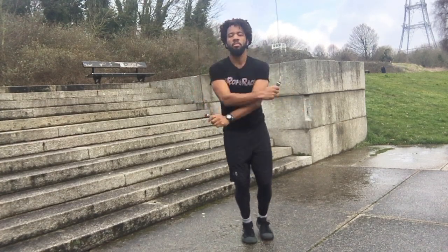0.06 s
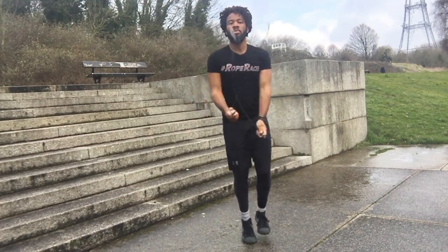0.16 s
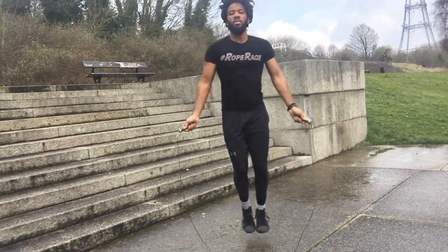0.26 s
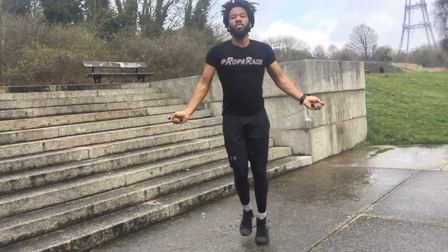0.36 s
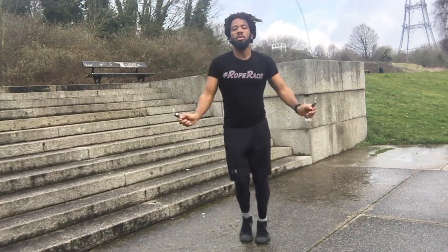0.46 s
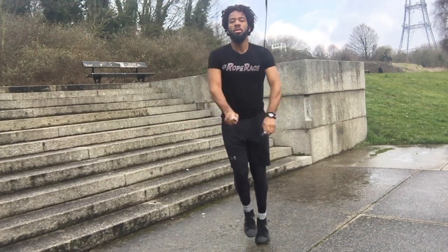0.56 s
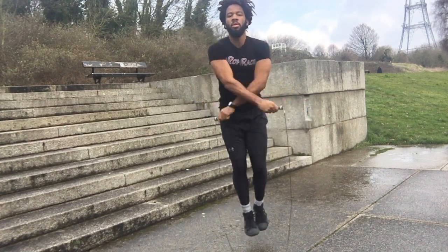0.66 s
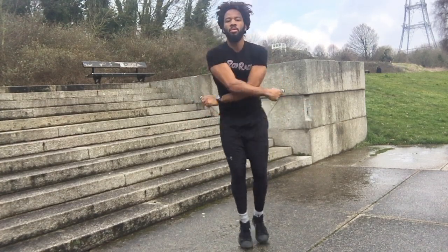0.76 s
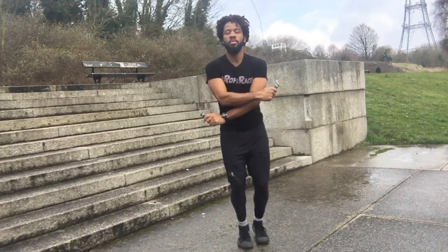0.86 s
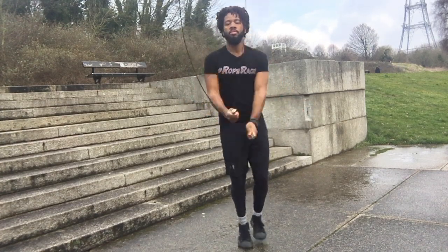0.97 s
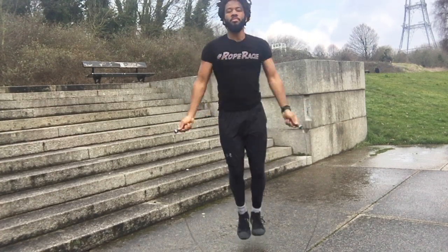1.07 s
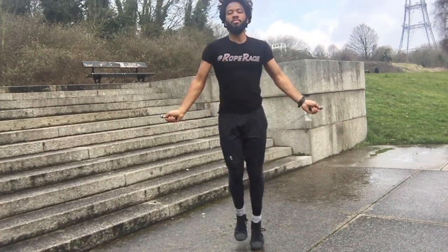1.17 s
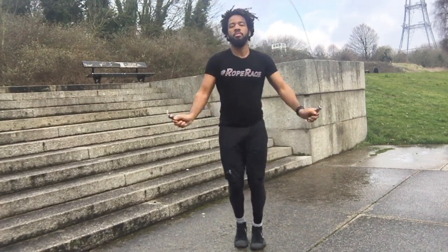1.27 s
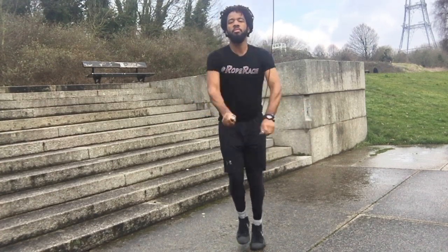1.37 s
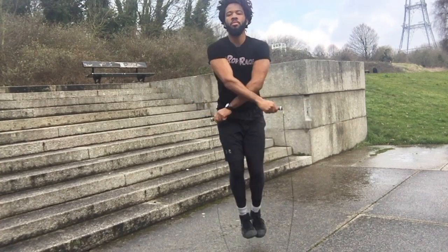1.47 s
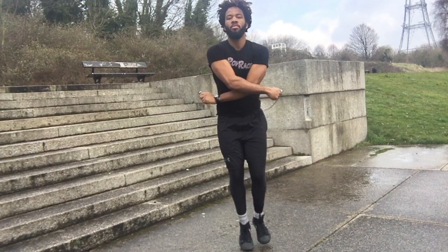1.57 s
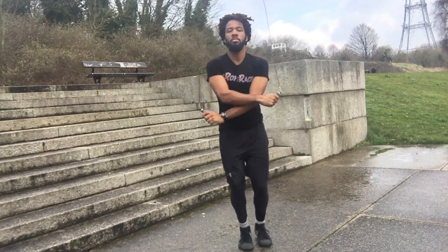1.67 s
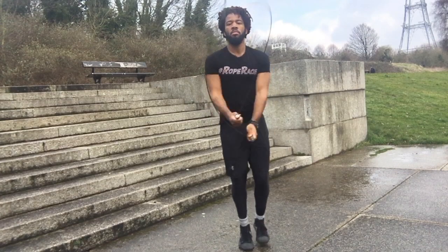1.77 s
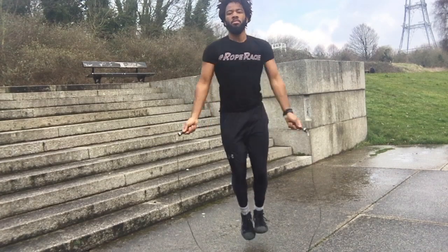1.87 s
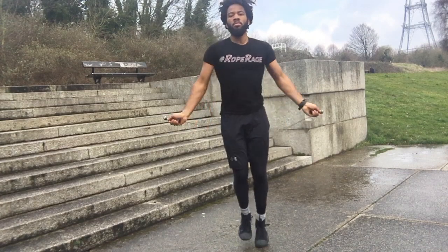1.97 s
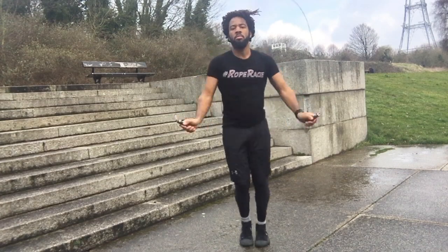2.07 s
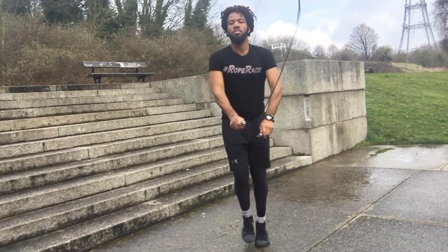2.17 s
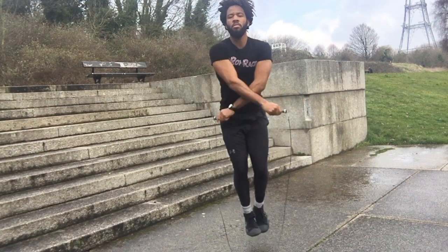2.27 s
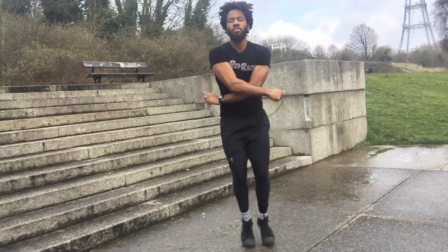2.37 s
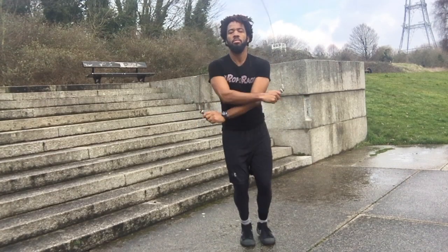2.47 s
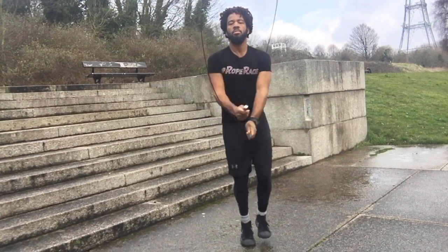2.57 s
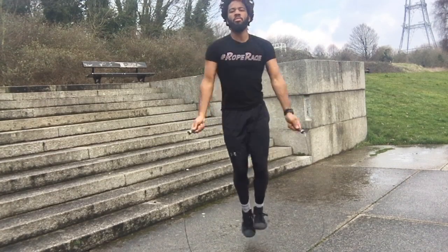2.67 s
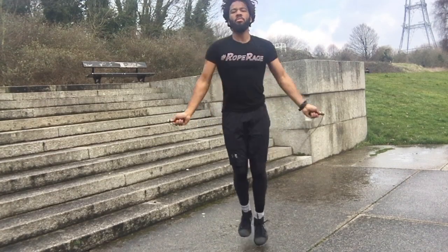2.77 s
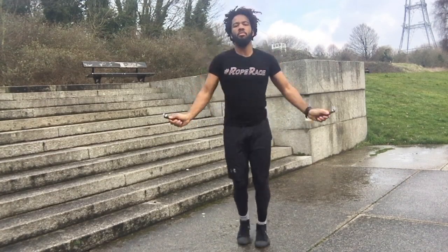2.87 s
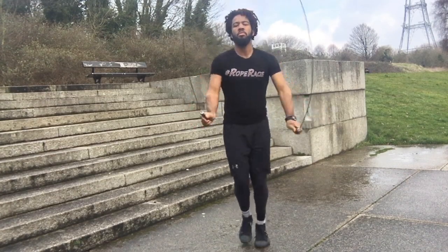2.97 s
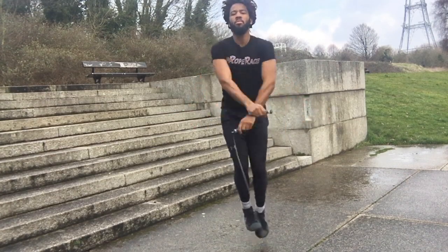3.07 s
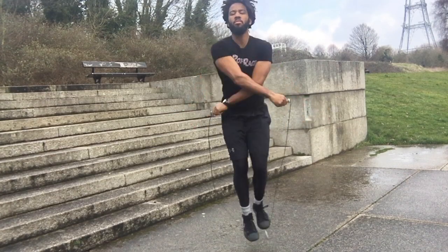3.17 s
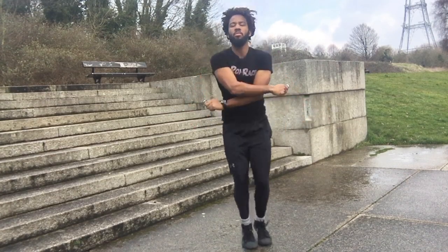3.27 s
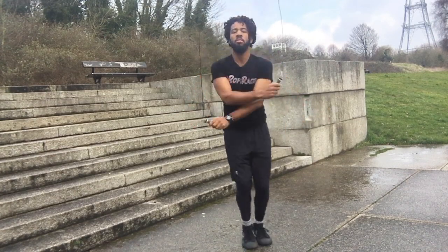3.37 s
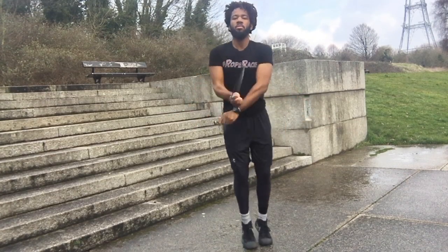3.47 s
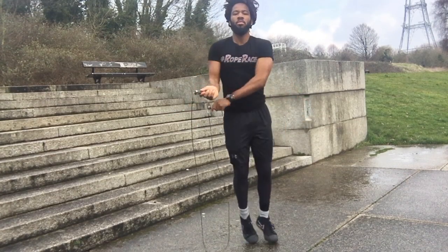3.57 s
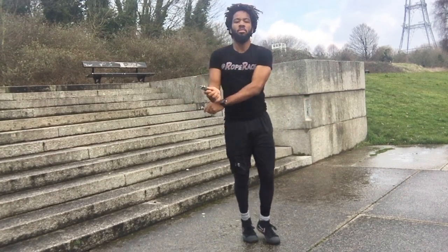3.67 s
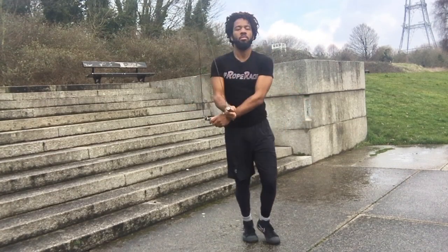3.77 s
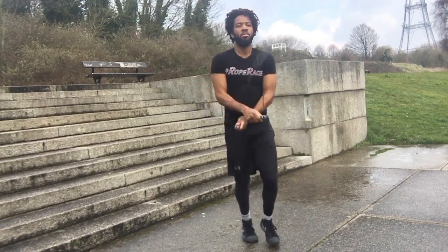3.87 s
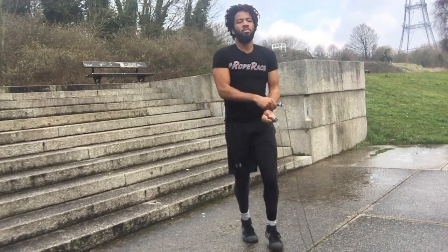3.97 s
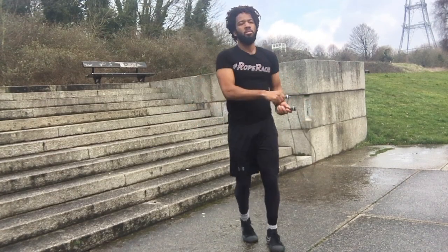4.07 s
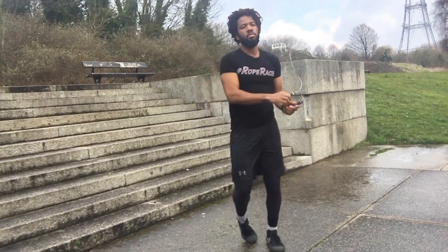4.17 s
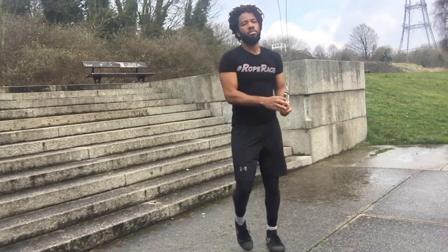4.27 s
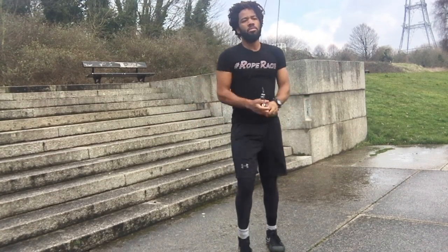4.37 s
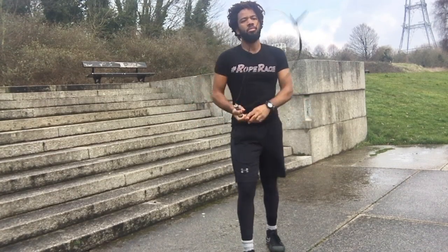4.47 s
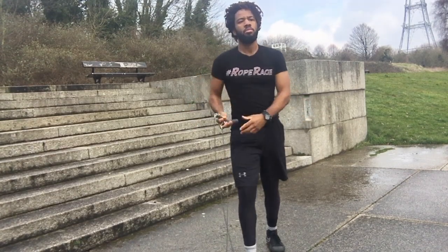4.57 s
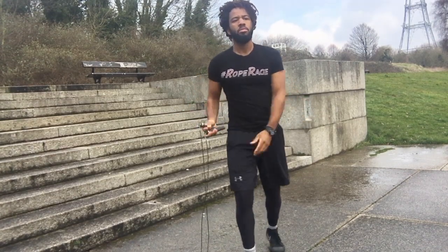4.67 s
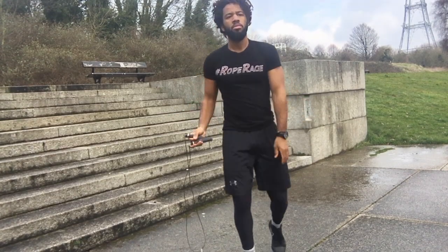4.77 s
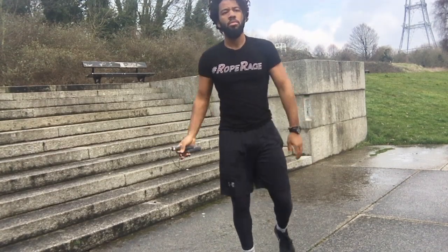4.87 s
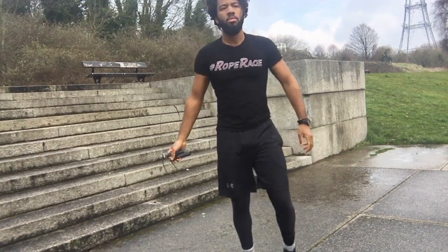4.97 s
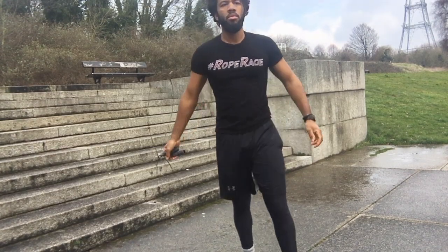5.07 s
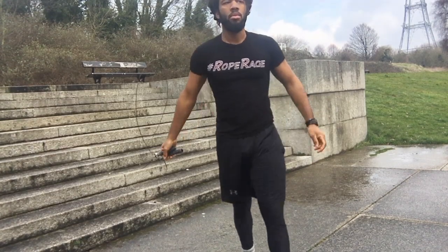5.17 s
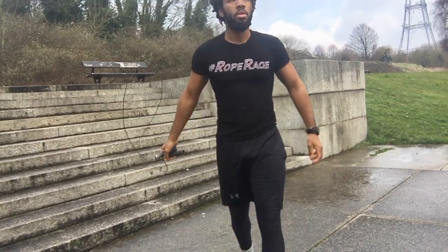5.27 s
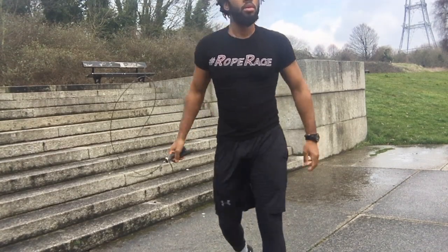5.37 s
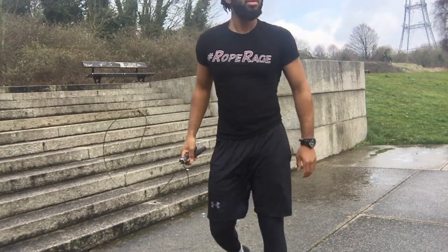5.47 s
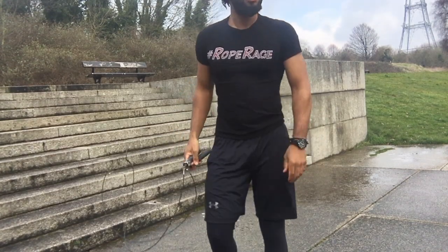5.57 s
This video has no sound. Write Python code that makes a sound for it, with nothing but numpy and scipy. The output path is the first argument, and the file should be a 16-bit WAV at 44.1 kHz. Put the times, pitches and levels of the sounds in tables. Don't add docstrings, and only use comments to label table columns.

```python
import sys
import numpy as np
from scipy import signal
from scipy.fft import rfft, irfft, next_fast_len
from scipy.io import wavfile

SR = 44100
rng = np.random.default_rng(int(sys.argv[2]) if len(sys.argv) > 2 else 0)


def gain_from_decibels(decibels):
    exponent = np.asarray(decibels, float) / 20
    return 10 ** exponent


def inscribe(sig):
    pcm = np.round(np.clip(np.atleast_2d(sig).T, -1, 1) * 32767)
    wavfile.write(sys.argv[1], SR, pcm.astype(np.int16))


N = 247401
T = np.arange(N) / SR

# start in seconds, peak in dB, spread of the contact in ms,
# splash in dB, air rush in dB.
SLAPS = [(0.3209, -18, 2.3, -25.5, -61), (0.7238, -12.5, 2, -30.5, -56), (1.1296, -12, 3.85, -31.5, -54.5),
         (1.5239, -11, 1.1, -36, -52.5), (1.9194, -11, 2.7, -34, -52), (2.3163, -14.5, 2.93, -29.5, -53),
         (2.7412, -14, 3.8, -30, -59), (3.1817, -19.5, 3.4, -30, -60.5), (3.626, -28, 3.5, -38, -63.5),
         (4.0241, -27, 0.97, -22, -64), (4.6702, -25.5, 3.3, -25.5, -81), (4.79, -30, 3.8, -28, -75.5),
         (4.8156, -30, 3.7, -37, -75)]
# middle in seconds, level in dB, # pitch
# in Hz, half length in ms, glide in Hz per ms.
SWELLS = [(0.049, -55, 970, 17, 1), (0.206, -52.5, 970, 16, -4.0), (0.268, -42, 1046, 8, 8),
          (0.283, -36.5, 1250, 7, 10.0), (0.296, -41, 1142, 8, -10), (0.31, -43, 1150, 6, -5),
          (0.425, -53, 990, 9.9, -5), (0.452, -54, 1102, 17, 1.0), (0.624, -53, 1160, 26, -9),
          (0.65, -51, 1110, 11.3, -14), (0.711, -50, 1058, 15.0, -12), (0.868, -53, 1081, 16.5, -4.0),
          (0.892, -47, 996, 22.0, -3.5), (0.932, -48, 850, 11.0, -9.0), (0.974, -51, 1042, 23, 7),
          (0.999, -51, 1040, 9.1, -2.0), (1.09, -44.5, 1110, 25, 8.5), (1.164, -47.5, 990, 16.0, -14),
          (1.204, -55, 1010, 14.6, -1.0), (1.254, -50, 1149, 10.9, 2.0), (1.268, -42.5, 1170, 9.1, 3),
          (1.322, -47, 888, 22, -6), (1.406, -56, 891, 16.0, 3.0), (1.426, -53, 1014, 12.0, 7.0),
          (1.444, -49.5, 1193, 18.0, -4), (1.472, -56, 1080, 27.0, 4), (1.484, -51, 1100, 12.0, -8),
          (1.551, -48, 1118, 22, 7.0), (1.569, -47, 880, 22, -12), (1.592, -45.0, 1021, 14, 7),
          (1.621, -38.5, 1163, 10.7, 0), (1.691, -55, 1029, 12.0, -3.0)]
LATE_SWELLS = [(1.729, -52, 889, 17.0, -9), (1.906, -36, 1268, 16.0, -1), (1.99, -46.5, 900, 10.0, 32),
               (2.02, -53, 850, 23.0, 3), (2.07, -48, 1119, 11.0, -3), (2.108, -40, 990, 24, -9.5),
               (2.142, -52, 880, 17, 1), (2.221, -52.5, 962, 30.0, 9.0), (2.243, -50, 1141, 20, 7.0),
               (2.263, -50, 1110, 16.7, -4), (2.282, -50, 1300, 18.0, 15.0),
               (2.296, -45.5, 1129, 16.0, -12), (2.344, -47, 1110, 12, 5), (2.408, -48.5, 1039, 23.0, -2),
               (2.425, -44, 1018, 15.0, -10), (2.48, -54, 1049, 12.0, 0.0), (2.728, -46, 1050, 7, -5),
               (2.584, -45.5, 1100, 10.0, -5.0), (2.694, -45, 950, 7, 20), (2.714, -36, 1220, 9.2, -21),
               (2.983, -54.5, 800, 16.4, 3), (3.096, -43.5, 1182, 16, -5), (3.204, -51, 1010, 24.2, 3),
               (3.285, -40, 1130, 18.2, 1.0), (3.309, -43, 1110, 11.8, 2.0), (3.452, -56, 945, 16.0, -9),
               (3.488, -53.5, 920, 32, -3.5), (3.507, -53, 860, 12.2, 9), (3.566, -50, 1150, 12, 17),
               (3.587, -42, 1079, 9.2, 18), (3.611, -48.5, 1027, 18.0, 4), (3.658, -55.5, 940, 32, 4.5),
               (.812, -47.5, 1120, 23, 12), (.841, -47, 1080, 12, -2), (1.878, -45, 980, 11.2, 14)]
LULLS = [(.125, -58, 790.5, 24, -4), (.155, -56, 981, 24, 4), (.535, -55, 850, 20, 0),
         (1.375, -57, 821, 24, 0), (1.83, -58, 880.3, 21, 1), (2.2, -58, 720, 30.7, 0.5),
         (2.545, -54.5, 799, 33.5, -1.5), (3.39, -58, 860, 20, -4)]


def rms_one(x):
    return x / np.sqrt(np.mean(x ** 2) + 1e-20)


def in_time(rows):
    s, *columns = np.transpose(rows)
    return [np.interp(T, s, column) for column in columns]


def drift(rate):
    r = np.exp(-2 * np.pi * rate / SR)
    settle = 40000
    noise = rng.standard_normal(N + settle)
    return rms_one(signal.lfilter([1], [1, -2 * r, r * r], noise)[settle:])


def peak(x, hz, width_hz):
    r = np.exp(-np.pi * width_hz / SR)
    ring = [1, -2 * r * np.cos(2 * np.pi * hz / SR), r * r]
    return signal.lfilter([(1 - r * r) / 2, 0, (r * r - 1) / 2], ring, x)


def coloured(x, spectrum):
    hz, level_db = np.transpose(spectrum)
    size = next_fast_len(N)
    bins = np.maximum(np.arange(size // 2 + 1) * SR / size, 1)
    gain = gain_from_decibels(np.interp(np.log(bins), np.log(hz), level_db))
    return rms_one(irfft(rfft(x, size) * gain, size)[:N])


def grains(count, share, spread_db):
    draw = rng.random((3, count))
    size = gain_from_decibels(-spread_db * np.log(1 - .99 * draw[1]))
    return (draw[0] < share) * size * np.sign(draw[2] - .5)


def add(out, s, x):
    i = int(s * SR)
    out[i:i + len(x)] += x[:N - i]


def wavering(hz, width_hz):
    turn = 2 * np.pi * np.cumsum(hz) / SR
    return drift(width_hz) * np.cos(turn) + drift(width_hz) * np.sin(turn)


def tent(rows):
    return np.max([db - np.where(T < s, rise, fall) * np.abs(T - s) for s, db, rise, fall in rows], axis=0)


def swing():
    rise_db_per_s, fall_db_per_s, lag_s = 85, 100, 0.023
    return tent([(row[0] + lag_s, row[-1], rise_db_per_s, fall_db_per_s) for row in SLAPS])


def surge():
    # moment of top speed in seconds, level in dB, rise in seconds, fall in seconds.
    speeds = [(0.028, -52, 0.03, .11), (.175, -55, 0.055, .079), (.285, -40, 0.035, .048),
              (.458, -48, .05, .04), (.72, -49, .17, .05), (.84, -45, .053, 0.089),
              (1.04, -51.5, .13, .046), (1.11, -42.5, .041, .086), (1.271, -46, .04, .029),
              (1.318, -45, .011, 0.047), (1.441, -48, .019, .052), (1.629, -42.5, .07, .11),
              (1.897, -38, 0.02202, .045), (2.075, -42, .02, 0.095), (2.271, -48.5, .08, .06),
              (2.43, -47, .05, .12), (2.575, -48.5, .012, 0.034), (2.706, -42, .02, 0.04),
              (3.082, -44.5, .017, 0.061), (3.2, -53.5, 0.046, .035), (3.29, -41, 0.036, 0.063),
              (3.45, -52.5, .015, .12), (3.57, -47, .025, 0.094)]
    drop_db = 14
    return tent([(s, db, drop_db / rise, drop_db / fall) for s, db, rise, fall in speeds])


def traffic():
    # time in seconds, rumble in dB, drone in dB.
    passing = [(0, -51, -57), (2.02, -51.5, -56), (2.33, -49.5, -68.5), (2.75, -51, -52),
               (3.03, -47.5, -55.5), (3.14, -50, -76), (3.69, -51.5, -65), (4.14, -49.5, -51),
               (4.47, -46, -52.5), (4.62, -59, -60.5), (4.83, -51, -54), (5.08, -48, -52),
               (5.61, -49.5, -53)]
    # pitch in Hz, level in dB per Hz.
    rumble_colour = [(15, -13.5), (25, -24), (42, -5.5), (59, 4), (112, -13), (145, -16), (220, -14.5),
                     (290, -36), (480, -120)]
    # time in seconds, level in dB.
    town = [(0, -56.5), (1.1, -56), (2.2, -57.5), (4.0, -58), (4.6, -61), (5.61, -61)]
    # pitch in Hz, level in dB per Hz.
    air_colour = [(71, -25.5), (120, -11.5), (557, -22.5), (930, -21.5), (1580, -27), (1790, -26.5),
                  (3050, -35.5), (3310, -35), (4060, -32), (4980, -34.5), (7500, -48), (16000, -61)]
    # time in seconds, pitch in Hz.
    engine = [(0, 112.7), (2.2, 119.8), (3.6, 103.8), (5.61, 94.7)]
    rumble_db, drone_db = in_time(passing)
    rumble = gain_from_decibels(rumble_db - 1.6) * coloured(rng.standard_normal(N), rumble_colour)
    wash_db = in_time(town)[0] + 1.17 * drift(1.34)
    wash = gain_from_decibels(wash_db) * coloured(rng.standard_normal(N), air_colour)
    drone = gain_from_decibels(drone_db - 1.5) * wavering(in_time(engine)[0], 5.0)
    return rumble + wash + drone


def gusts():
    # time in seconds, level in dB.
    wind = [(0, -60.5), (5.61, -65.5)]
    air = peak(peak(rng.standard_normal(N), 240, 330), 240, 330)
    return gain_from_decibels(in_time(wind)[0] - 5.0 + 1.5 * drift(7.1)) * rms_one(air)


def rustle():
    # time in seconds, level in dB.
    motion = [(0, -51.5), (.35, -61.5), (.55, -76), (.68, -62.5), (1.25, -65), (1.38, -66), (1.48, -65),
              (2.2, -63.5), (2.76, -56.5), (3.23, -61.5), (3.37, -57), (3.41, -76), (3.46, -55),
              (3.82, -69.5), (4.1, -58.5), (4.3, -65), (4.7, -72)]
    # pitch in Hz, level in dB per Hz.
    grain_colour = [(700, 0.5), (1500, 2.5), (3000, 1), (5000, -1), (8000, -8.5), (12000, -13.5),
                    (16000, -14.5)]
    follow, range_db = 0.38, 21
    level_db = in_time(motion)[0] - 9 * np.clip((T - 4.7) / .5, 0, 1)
    level_db = level_db + follow * np.clip(swing() + 60, -range_db, range_db)
    grain = coloured(grains(count=N, share=0.18, spread_db=-1.0), grain_colour)
    clumps = gain_from_decibels(1.8 * drift(50) + 2.64 * drift(31))
    bursts = signal.lfilter([1], [1, -.985], np.abs(grains(count=N, share=.008, spread_db=1.0)))
    drops = rms_one(peak(bursts * rng.standard_normal(N), 4100, 4900))
    return gain_from_decibels(level_db + 1.0) * (clumps * grain + gain_from_decibels(-17) * drops)


def ticks(rows):
    out, t = np.zeros(N), T[:2500]
    for s, level_db, hz, bright_db, length_ms in rows:
        u = t * 1000 / max(length_ms, .3)
        clicks = grains(count=len(t), share=0.44, spread_db=1.0) * np.sqrt(u) * np.exp(-u)
        ring = rms_one(peak(peak(clicks, hz, 2100), hz, 2100))
        tick = ring + gain_from_decibels(bright_db) * rms_one(peak(clicks, 3570, 7300))
        add(out, s, gain_from_decibels(level_db + 3.5) * tick / np.abs(tick).max())
    return out


def handles_and_grit():
    # start in seconds, peak in dB, pitch in Hz, bright share in dB.
    skipping = [(0.377, -44, 3100, -4), (0.4266, -42.5, 3200, -8), (0.4946, -41.5, 3140, -10),
                (2.0667, -53.5, 5770, -13), (0.7859, -53, 3184, -12), (0.861, -50.5, 5600, 12),
                (0.9065, -46, 3460, -10), (1.1505, -39, 4900, -5), (1.186, -44, 3000, -9),
                (1.276, -41.5, 3360, 0), (0.022, -49, 6000, 0), (1.7, -49, 3100, -7),
                (1.668, -49.5, 4000, 5), (1.6876, -47, 2960, 1), (.0766, -49, 3000, -19),
                (1.866, -47, 4710, -5.5), (1.8, -43, 3300, -13), (2.3612, -33.5, 3000, -22),
                (2.2, -40, 3600, -4), (2.4543, -45.5, 3800, -1), (2.4913, -45.5, 3340, -4),
                (2.7564, -33, 4330, 2), (2.7635, -33, 4800, 5), (3.385, -49.5, 3100, 0),
                (2.8013, -35.5, 5800, 7), (2.785, -42, 3100, -7), (2.7935, -41.5, 2600, -4),
                (2.669, -51.5, 1870, -13.5), (0.58, -48.5, 3380, -4.5), (0.41, -54, 2300, -1),
                (2.904, -47, 4200, -1), (1.993, -45, 3500, -9), (3.331, -44, 2570, -1),
                (2.0925, -55, 3065, -11)]
    # start in seconds, peak in dB, pitch in Hz, bright share in dB, length in ms.
    scuffs = [(1.055, -47, 5453, 7, 4.96), (1.463, -44, 4700, -2, 2.6), (1.831, -46.5, 4125, 0.5, 10),
              (3.084, -45.5, 4503, 1, 5.9), (3.444, -47, 3583, 4, 4.9),
              (3.4728, -45.5, 3058, -6, 3.27), (3.694, -50.5, 2944, 3, 2.58),
              (3.7457, -51, 3550, 1, 4.4), (3.9418, -51, 3075, 0, 4.5), (4.036, -39.5, 3050, 6, 4.1),
              (4.068, -44, 3430, -3, 6.2), (4.0916, -32.5, 3500, -10, 2),
              (4.101, -44.5, 3770, -3, 7.8), (4.1528, -52, 3330, -4.5, 7),
              (4.1923, -54, 4300, 2, 2.5), (4.28, -55, 2900, -7, 2.5), (4.345, -52, 2950, -5, 2.9),
              (4.444, -54, 3960, 1, 5.2), (4.575, -45.5, 2570, -11, 3.8), (4.699, -49, 4480, -9, 1.6),
              (5.279, -53, 2500, -8, 1.5), (5.2933, -36.5, 5630, -13, 1.1),
              (4.005, -53, 3400, -10, 4.8), (4.255, -64, 6900, 0, 3.4), (4.317, -62, 7000, 2, 2.7),
              (4.41, -65, 6800, 1, 2.3), (5.16, -59, 2500, -17, 3.5), (5.301, -48.5, 3560, -6, 11.6),
              (5.5071, -64, 7000, -5, 2.5)]
    length_ms, ms_per_db = 2.3, 0.53
    usual = [(*row, length_ms - ms_per_db * (row[1] + 42)) for row in skipping]
    return ticks(usual + scuffs)


def landings():
    # landing in seconds, peak in dB, pitch in Hz.
    soles = [(0.026, -36.5, 453), (0.411, -41.5, 518), (0.485, -42, 578), (.8275, -42, 740),
             (0.8528, -38, 523), (1.246, -38.5, 394), (1.2943, -38, 518), (1.6291, -41, 461.4),
             (1.6604, -39, 398.4), (1.921, -38.5, 560), (2.0373, -36.5, 565), (2.0883, -43, 565),
             (2.3635, -30.5, 554), (2.4313, -39.5, 590), (2.4479, -39.5, 490), (2.8596, -35.5, 535),
             (2.9066, -38, 482), (3.2884, -40, 339), (3.3247, -34.5, 552), (3.6754, -46, 362.6),
             (5.2961, -52, 800)]
    out, t = np.zeros(N), T[:2500]
    for s, level_db, hz in soles:
        push = t / 0.0008 * np.exp(-t / 0.00052)
        push = push + 0.11 * rng.standard_normal(len(t)) * np.exp(-t / 0.013)
        thud = peak(peak(push, hz, 460), hz, 460)
        thud = thud + gain_from_decibels(-12) * peak(push, 362, 180) - gain_from_decibels(-12.0) * peak(push, 3 * hz, 540)
        add(out, s - 0.0015, gain_from_decibels(level_db + 4.5) * thud / np.abs(thud).max())
    return out


def whoosh():
    cruise_db, cruise_hz, hz_per_db = -61.5, 930.6, 11.5
    rush_under_db = 12.5
    surge_db = surge()
    whoosh_db = np.maximum(surge_db, cruise_db)
    band = gain_from_decibels(whoosh_db - 8) * wavering(cruise_hz + hz_per_db * (whoosh_db - cruise_db), 260)
    rush = rms_one(peak(rng.standard_normal(N), 2000, 1600))
    rush_level = gain_from_decibels(swing() - 4.5) + gain_from_decibels(surge_db - rush_under_db - 13)
    turning = np.clip((4.15 - T) / .1, 0, 1)
    return turning * (band + rush_level * gain_from_decibels(4.8 * drift(34)) * rush)


def singing():
    under_db, blur_hz = 8.0, 40.0
    s, _, hz = np.transpose(sorted(SWELLS + LATE_SWELLS + LULLS))[:3]
    level_db = np.clip(surge() - under_db, -66, -55)
    level_db = level_db - 30 * np.clip((T - 3.85) / 0.092, 0, 1)
    return gain_from_decibels(level_db) * wavering(np.interp(T, s, hz), blur_hz)


def swells():
    roughness = 0.26
    out = np.zeros(N)
    for s, level_db, hz, length_ms, glide in SWELLS + LATE_SWELLS + LULLS:
        half = max(length_ms, 4) * 0.92 / 1000
        t = np.arange(-half, half, 1 / SR)
        rough = np.interp(t * 300 + 20, np.arange(40), rng.standard_normal(40))
        turn = 2 * np.pi * (rng.random() + hz * t + 500 * glide * t ** 2)
        shape = (1 + roughness * rough) * np.abs(np.cos(np.pi * t / half / 2)) ** 1.76
        add(out, max(s - half, 0), gain_from_decibels(level_db + 1.5) * shape * np.sin(turn))
    return out


def slaps():
    # pitch in Hz, width in Hz, level in dB.
    resonances = [(1230, 2430, 3), (3110, 1390, 6), (4470, 1700, 2.5), (6000, 1900, -2),
                  (10880, 6000, -10.5)]
    build_ms, bright_db, volley_db = 0.91, 1.5, -7
    out, t = np.zeros(N), T[:6000]
    ms = t * 1000

    def colour(x):
        return sum((-1) ** k * gain_from_decibels(db + bright_db * (k - 2)) * peak(x, hz, width_hz)
                   for k, (hz, width_hz, db) in enumerate(resonances))

    for s, level_db, spread_ms, splash_db, _ in SLAPS:
        shape = np.exp(-np.abs(ms - build_ms) / np.where(ms < build_ms, .4, max(spread_ms, .3)))
        crack = colour(grains(count=len(t), share=.35, spread_db=5.0) * shape)
        splash = colour(grains(count=len(t), share=.3, spread_db=6.0) * np.exp(-t / 0.018))
        slap = gain_from_decibels(volley_db) * crack / np.abs(crack).max()
        slap = slap + gain_from_decibels(splash_db) * splash / splash[:900].std()
        add(out, s, gain_from_decibels(level_db + 1.0) * slap)
    return out


def contacts():
    # start in seconds, peak in dB, pitch in Hz.
    touches = [(0.3218, -19.5, 4800), (0.324, -21, 8800), (1.138, -27, 6500), (0.3261, -19, 5600),
               (0.327, -21, 5100), (0.3472, -29, 3500), (0.7246, -10, 5560), (0.7274, -22, 5300),
               (0.727, -19, 4600), (0.732, -25, 4800), (1.1304, -15, 5950), (1.1313, -16.5, 3620),
               (1.133, -18, 5000), (1.1334, -25.4, 5200), (1.139, -25, 4700), (1.1423, -24, 5500),
               (1.5247, -8.5, 5800), (1.5259, -16, 5400), (1.527, -18, 4700), (1.9197, -11.5, 3800),
               (1.921, -21, 6500), (1.9217, -9.5, 6800), (1.9225, -24, 5100), (1.9236, -23, 3800),
               (2.3175, -12, 5000), (2.3193, -22, 4900), (2.333, -28, 4000),
               (2.742, -15, 6600), (2.743, -14, 5800), (2.744, -20.6, 5295), (2.745, -15, 5400),
            (2.7473, -16.5, 7600), (2.7541, -24, 4698), (3.1828, -20, 5300), (1.1632, -32, 3401),
            (3.185, -18, 5070), (3.186, -22, 4790), (3.187, -26, 3405), (3.192, -25, 3600),
            (3.6261, -25, 7800), (3.6273, -26, 7800), (3.6293, -29.5, 4890), (1.174, -37, 6500),
            (4.025, -22.5, 8200), (4.0266, -28.1, 8500), (4.0376, -33, 4700), (4.6717, -23.2, 5850),
            (4.6738, -32, 5700), (2.3435, -33, 4000), (4.7927, -29, 4800), (4.815, -33, 6560),
            (4.8173, -33, 6060), (4.8196, -31, 6200)]
    rattle_ms = .25
    out, t = np.zeros(N), T[:400]
    for s, level_db, hz in touches:
        click = 0.59 * grains(count=len(t), share=.5, spread_db=2.5) * np.exp(-t * 1000 / rattle_ms)
        click[0] = 2 * np.sign(click.sum() + 1e-9)
        crack = rms_one(peak(click, hz, .9 * hz))
        crack = crack + gain_from_decibels(-8.0) * rms_one(peak(peak(click, 3400, 9000), 3400, 9000))
        crack = crack + gain_from_decibels(-14) * rms_one(peak(click, 1500, 900))
        add(out, s - .0001, gain_from_decibels(level_db - 1.0) * crack / np.abs(crack).max())
    return out


def steps(x):
    # delay in seconds, level in dB.
    echoes = [(.0065, -22), (0.02, -32), (0.025, -28.5), (0.03, -31.5)]
    t = T[:4000]
    reply = sum(gain_from_decibels(db) * (t > lag) * np.exp(-np.maximum(t - lag, 0) / 0.0014) for lag, db in echoes)
    reply = reply * rng.standard_normal(len(t)) / np.sqrt(0.00025 * SR)
    return peak(signal.fftconvolve(x, reply)[:N], 4300, 7000)


def more_scuffs():
    # start in seconds, peak in dB, pitch in Hz, bright share in dB, length in ms.
    scrapes = [
        (.346, -37.5, 3498, 2, 7.3),
        (2.463, -48, 3300, -8, 8),
        (4.046, -45, 3800, 0, 8),
    ]
    return ticks(scrapes)


def whips():
    # middle in seconds, centre in Hz, level in dB, half length in seconds.
    bursts = [(0.354, 1900, -51, 0.026), (0.658, 3500, -57, 0.049), (1.095, 1643, -44.5, 0.026),
              (1.571, 1700, -51.5, .04), (1.89, 1550, -44.5, 0.009), (2, 1740, -52.5, 0.041),
              (2.262, 1500, -48, 0.031), (2.954, 1700, -52.5, .025), (3.856, 1497, -59, 0.023),
              (2.703, 1503, -50, 0.013), (1.44, 2100, -55, 0.045), (4.019, 940, -60, 0.031),
              (2.98, 787, -56, 0.024)]
    width_share = 0.26
    out = np.zeros(N)
    for s, hz, level_db, half in bursts:
        u = np.linspace(0, 1, int(2 * half * SR))
        air = rms_one(peak(rng.standard_normal(6000), hz, width_share * hz))
        add(out, s - half, gain_from_decibels(level_db) * np.sin(np.pi * u) ** 1.2 * air[-len(u):])
    return out


def birds():
    # start in seconds, end in seconds, start pitch in Hz, end pitch in Hz, level in dB.
    calls = [(0.51, 0.6, 3900, 4210, -70.5), (1.497, 1.533, 5170, 5330, -62),
             (1.992, 2.054, 3970, 3980, -59), (4.33, 4.4, 2930, 2960, -68), (4.2, 4.232, 3600, 3780, -70),
             (4.225, 4.27, 3850, 3950, -69), (4.352, 4.39, 2050, 1950, -64), (4.385, 4.47, 4750, 4620, -77),
             (4.243, 4.344, 3250, 2930, -59), (4.465, 4.57, 7600, 7720, -78),
             (4.575, 4.672, 8050, 7800, -76), (5.43, 5.59, 7400, 7220, -82)]
    out = np.zeros(N)
    for start, end, start_hz, end_hz, level_db in calls:
        u = np.linspace(0, 1, int((end - start) * SR))
        wander = rng.standard_normal((2, 30))
        waver, fade = (np.interp(u * (end - start) * 90, np.arange(30), row) for row in wander)
        hz = (end_hz + (start_hz - end_hz) * (1 - u) ** 5.6) * (1 + 0.012 * waver)
        tone = np.sin(2 * np.pi * np.cumsum(hz) / SR)
        add(out, start, gain_from_decibels(level_db + 3.6 * fade) * np.sin(np.pi * u) ** 0.35 * tone)
    return out


def scene():
    background = traffic() + gusts() + birds()
    small = handles_and_grit() + landings()
    cracks = slaps() + contacts()
    echoes = steps(cracks + gain_from_decibels(7.5) * small)
    rope_in_air = whoosh() + singing() + swells() + whips()
    return (background + rustle() + small + rope_in_air + cracks + echoes + more_scuffs())[None]


def band_limit(x):
    return signal.sosfilt(signal.butter(12, 17020, fs=SR, output="sos"), x)


def record(dry):
    # pitch in Hz, width in Hz, share removed.
    dips = [(10370, 1260, 0.33), (4980, 630, 0.44), (2377, 216, 0.16)]
    for hz, width_hz, share in dips:
        dry = dry - np.clip(share, 0, 1) * peak(dry, hz, width_hz)
    mix = signal.sosfilt(signal.cheby2(12, 60, 16900, fs=SR, output="sos"), dry)
    return band_limit(mix)


dry = scene()
out = record(dry)
inscribe(out)
```